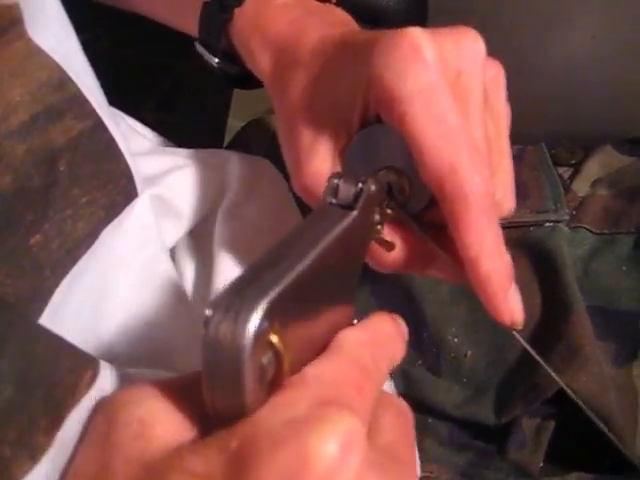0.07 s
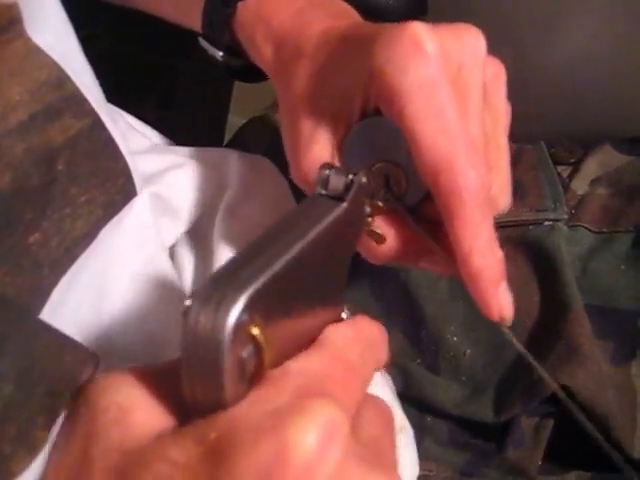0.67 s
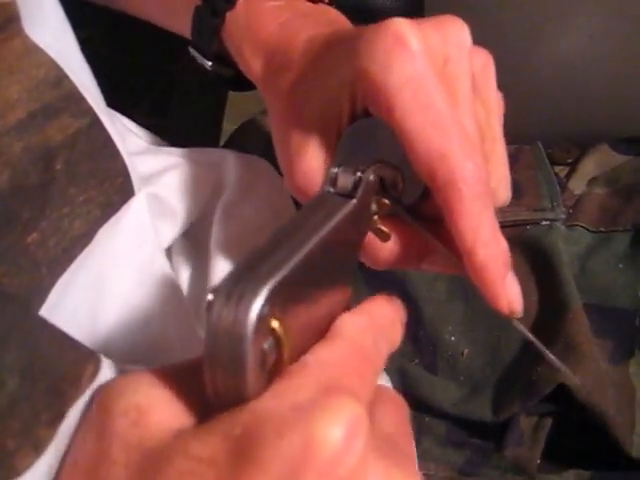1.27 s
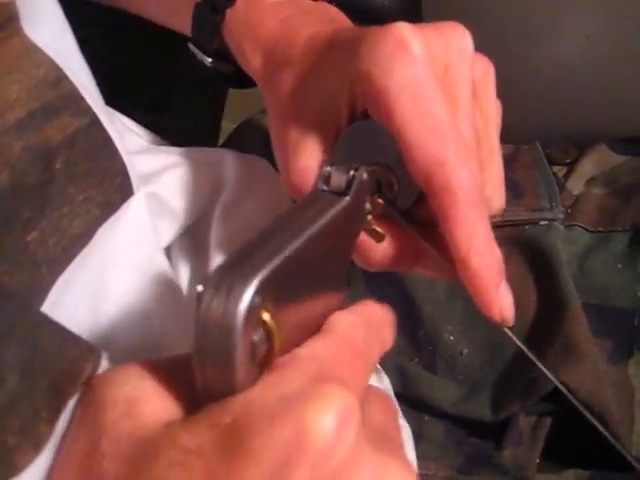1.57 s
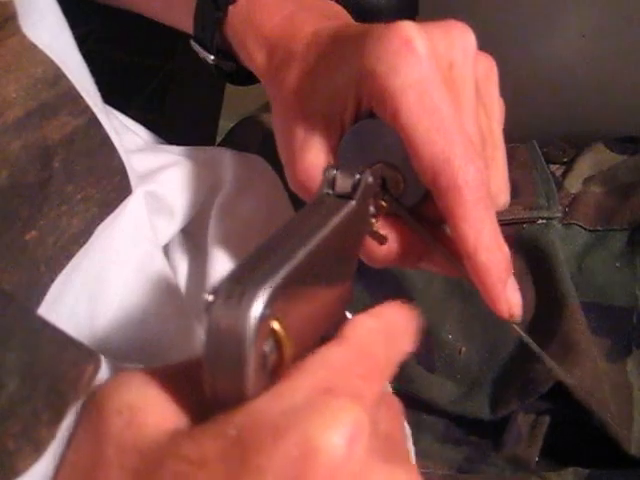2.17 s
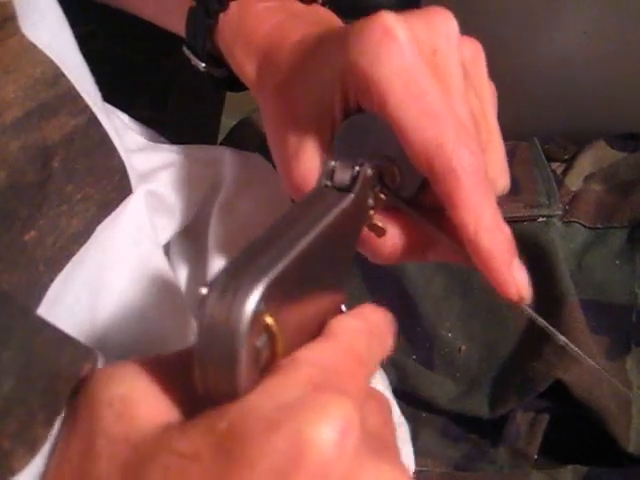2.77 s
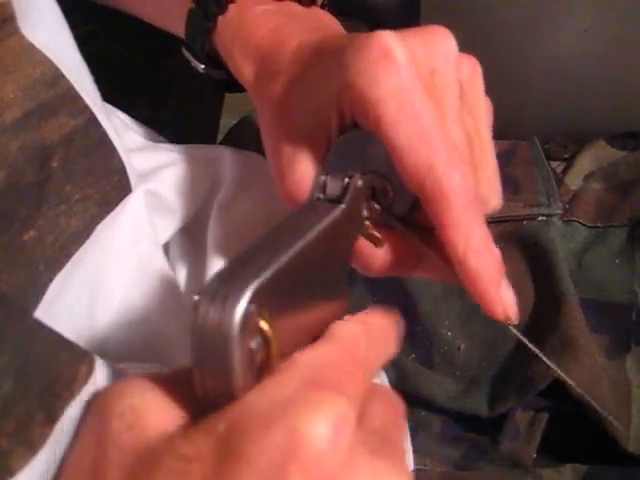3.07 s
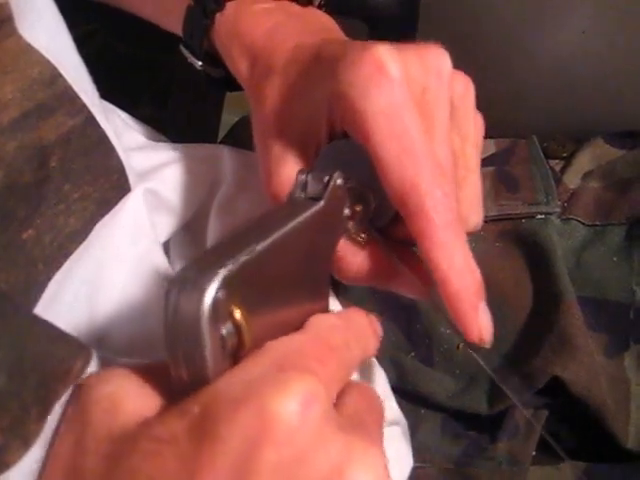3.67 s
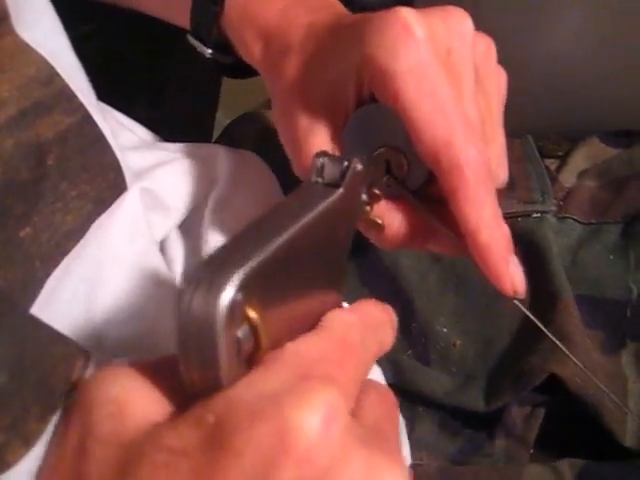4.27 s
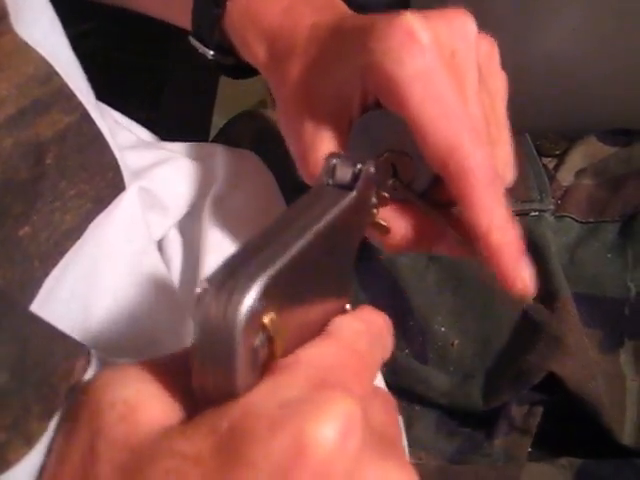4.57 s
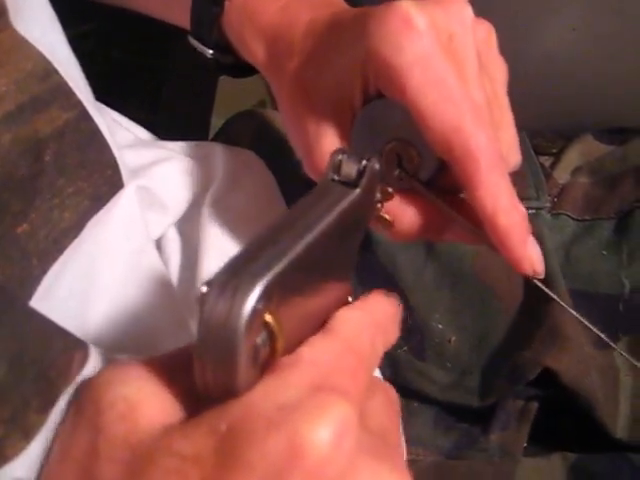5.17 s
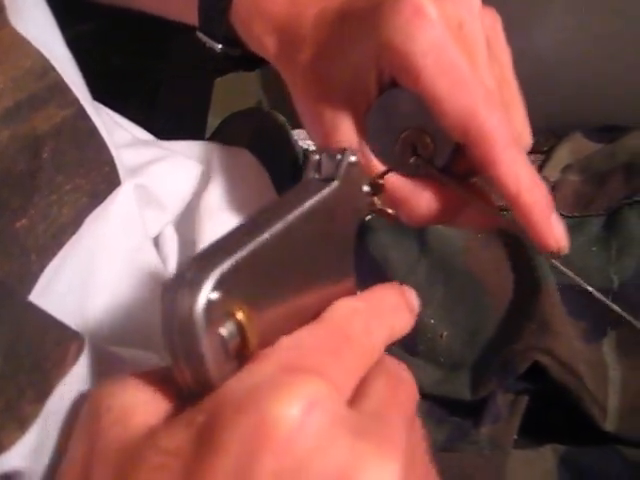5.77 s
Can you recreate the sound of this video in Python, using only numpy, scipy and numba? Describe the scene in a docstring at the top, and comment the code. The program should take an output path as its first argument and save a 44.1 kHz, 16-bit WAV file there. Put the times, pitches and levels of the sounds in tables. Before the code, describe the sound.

Sharp metallic snaps repeat throughout as a manual lock pick gun is worked against a lock, close to the microphone in a small room. Softer clicks of the trigger pulling and resetting fall between the snaps, with occasional rattles and brief scrapes from the needle. Each snap distorts slightly and makes the level dip for a moment. A short, bright echo and faint hiss and hum lie behind.

```python
"""A hand-worked lock pick gun snaps over and over in a cylinder lock, close by in a small room.
Each squeeze clacks, creeps and lets the hammer snap onto the needle; on release the trigger knocks
back, scrapes and latches. Every hit makes the steel ring, and the needle rattles and drags in the lock.
The snaps overload the microphone, whose gain control briefly turns everything down after each one,
including the room's echo, hiss and hum."""
import sys
import numpy as np
from scipy import signal
from scipy.fft import rfft, irfft
from scipy.io import wavfile
from scipy.ndimage import uniform_filter1d
from numba import njit

SR = 44100
rng = np.random.default_rng(int(sys.argv[2]) if len(sys.argv) > 2 else 0)


def put_to_file(sound):
    """Save the sound as 16-bit audio at rate SR, in the file named by the first command-line argument."""
    columns = np.atleast_2d(sound).T  # one column per channel
    safe = np.clip(columns, -1, 1)
    whole_steps = np.round(safe * 32767)
    wavfile.write(sys.argv[1], SR, whole_steps.astype(np.int16))


N = 265746

# Room air and microphone hiss: (frequency [Hz], level [dB])
AIR_SPECTRUM = [(30, 0), (100, -3), (300, -4), (500, -7.5), (1100, -5.5), (2000, -9), (5000, -11),
                (9000, -12), (11000, -8), (13000, -14.5), (15500, -13.5)]
# The room's hum and a camera's whine: (pitch [Hz], level [dB])
HUM_TONES = [(172, -61.5), (288, -62), (975, -60), (7560, -50.5)]
# The room's echo: (frequency [Hz], fade time [s], level [dB]). A fade time, or t60, is a drop of 60 dB.
ECHO_BANDS = [(150, .4, -16), (700, .4, -11), (1400, .45, -3), (2200, .52, 3), (2800, .48, -1.5),
              (4000, .48, 1), (6000, .46, 1.3), (9000, .42, 1.5), (15000, .33, 0)]
# A soft, low rush of room noise: (frequency [Hz], level [dB])
SWELL_SPECTRUM = [(60, -10), (250, -4), (500, 0), (850, -5), (1200, 1), (1700, -10), (4000, -28),
                  (15000, -45)]
# The needle drags in the keyhole: (start [s], length [s], level [dB])
NEEDLE_DRAGS = [(2.635, .115, -36.5), (4.955, .065, -35.5)]
# The hiss of the needle and the spring: (frequency [Hz], level [dB])
RASP_SPECTRUM = [(1500, -25), (3500, -9), (5000, -2), (6200, 0), (8000, -8), (15000, -22)]
# How loud the spring sizzles as the scene goes on: (time [s], level [dB])
SIZZLE_LEVELS = [(.28, -33), (1.14, -19), (1.89, -24), (2.27, -34), (5.5, -34)]
# The noisy crack of steel on steel: (frequency [Hz], level [dB])
CRACK_SPECTRUM = [(60, -15), (250, -10), (500, -14.5), (1000, -14.5), (1300, -16.5), (2100, -1), (3000, -3),
                  (5500, 0), (8000, -3), (11000, -4), (15500, -11)]
# Needle and pins rattle in the keyhole: (time [s], level [dB], pitch [Hz], brightness [dB])
PIN_RATTLES = [(.4294, -28, 2200, 0), (.5765, -23, 2790, 4.5), (2.33, -29, 2530, 2),
               (2.6352, -7.4, 2510, 1.5), (2.753, -28, 2330, 6), (2.996, -23, 2730, 1),
               (3.273, -14.6, 2260, 8.5), (3.488, -12.4, 2290, 7.5), (3.5169, -28, 2190, -9),
               (4.1109, -28, 2380, 10), (4.6039, -16.5, 2420, 3), (5.076, -25, 2440, 7),
               (5.8898, -17.7, 2800, 1), (5.8949, -22, 2210, 0), (5.9032, -18.6, 2750, 1.5),
               (5.9069, -26, 2680, -12)]
# The tones of the steel gun: (pitch [Hz], fade time [s], then a level [dB] for each spot named below)
STEEL_TONES = [(760, .007, -17.5, -12, -22, -34, -24, -17), (1680, .007, -13.5, -3, -26, -20, -21, -15),
               (2660, .011, -10.5, -4, -14, -14, -4, -9), (3300, .012, -11, -2, -5, -13, -9, -14),
               (3990, .011, -13, 1.5, -3, -13, -5, -17), (4450, .012, -13, 1, -5, -14, -5, -11),
               (5350, .012, -13, -2, -12, -14, -7, -3), (5850, .012, -14, -1, -6, -15, -5, -14),
               (6950, .012, -20, -1, -18, -22, -8, -20), (8450, .012, -23, -6, -11, -25, -10, -24)]
TRIGGER, HAMMER, RETURN_STOP, RAMP, CATCH, CATCH_EDGE = range(6)
# How each kind of hit behaves:
# (rise [s], time touching [s], main tone's fade time [s], crack [dB], first tick [dB], echo share [dB])
PULL_HIT = (.0003, .0015, .009, -11, 7, 3.5)
CREEP_HIT = (.0003, .0009, .013, -11, 0, 6)
SNAP_HIT = (.0002, .0026, .011, 2.5, 24, -5.6)
KNOCK_HIT = (.0003, .0019, .009, -11, 6, 2.5)
SCRAPE_HIT = (.0005, .0006, .013, -14, -6, 2)
LATCH_HIT = (.0002, .0012, .011, -2, 19, .8)
RATTLE_HIT = (.0002, .0010, .016, -2, 8, 4)
# Letting the trigger go; a lead is how long before the latch a sound comes:
# (latch time [s], knock lead [s], knock [dB], knock brightness [dB], scrape lead [s], scrape [dB])
TRIGGER_RELEASES = [(.0433, .045, -4, 0, .0069, -7.5), (.5244, .0381, -5, 2.5, .0086, -7.5),
                    (.9416, .0525, -5, -1, .01, -6), (1.3448, .0358, -3.5, -2.5, .0062, -15),
                    (1.7388, .0526, -2.5, -3, .0082, -9.5), (2.1043, .0355, -2.5, 0, .0086, -9.5),
                    (2.4697, .0348, -5, 3.5, .0061, -7.5), (3.0101, .0267, -2.5, 1, .0054, -9.5),
                    (3.4137, .0386, -2, -3, .0052, -8), (3.9519, .0365, -2, -2, .0051, -7),
                    (4.427, .0453, -4, 2, .0081, -7), (4.8366, .0381, -5, 1, .0062, -5.5),
                    (5.2779, .0423, -5, 4, .0065, -5.5), (5.7667, .0548, -4.5, -1, .0065, -5.5)]
# Squeezing the trigger; leads count back from the snap:
# (snap time [s], pull lead [s], pull [dB], creep lead [s], creep [dB], thud [dB])
TRIGGER_SQUEEZES = [(.2798, .1241, -9, .0548, -11.5, -35), (.7069, .0796, -6.5, .0208, -12.5, -7),
                    (1.1437, .0944, -5.5, .0324, -13.5, -13), (1.5031, .0669, -9, .0152, -13, -11),
                    (1.8881, .0654, -10.5, .0156, -12.5, -12), (2.2655, .0692, -9.5, .0188, -11, -11),
                    (2.7822, .2106, -7.5, .1567, -11, -22), (3.1883, .0601, -7, .0144, -15.5, -10),
                    (3.7326, .1791, -9.5, .0171, -14, -6), (4.1568, .1069, -9, .0543, -20.5, -35),
                    (4.6118, .0858, -7, .0283, -15.5, -10), (5.0484, .1045, -9.5, .0294, -11.5, -35),
                    (5.5058, .0971, -7, .0373, -20.5, -28)]


def gain_of(db):
    """Turns decibels into a number to multiply by."""
    return 10 ** (np.asarray(db) / 20)


def evened(x):
    """Scales a sound to an average (rms) level of 1."""
    return x / np.sqrt(np.mean(x ** 2) + 1e-20)


def evened_hit(x):
    """Scales a hit to an average (rms) level of 1 over its first 5 ms."""
    return x / np.sqrt(np.mean(x[:220] ** 2))


def look_up(points, hz):
    """Reads between a table's rows along a log-frequency axis."""
    known_hz, value = np.transpose(points)
    return np.interp(np.log(hz + 1), np.log(known_hz + 1), value)


def noise(spectrum, size):
    """Noise with the given balance of lows and highs."""
    hz = np.fft.rfftfreq(size, 1 / SR)
    return evened(irfft(rfft(rng.standard_normal(size)) * gain_of(look_up(spectrum, hz)), size))


def wobble(size, smooth_samples):
    """A smooth random wiggle."""
    return evened(uniform_filter1d(rng.standard_normal(size), size=smooth_samples))


def add(mix, start_s, sound):
    """Mixes a sound in at the given time."""
    part = mix[max(round(start_s * SR), 0):][:len(sound)]
    part += sound[:len(part)]


def background(air_db=-44.5, waver_hz=5):
    """Room air and microphone hiss, with a few gently wavering tones."""
    out = gain_of(air_db) * noise(AIR_SPECTRUM, N)
    for hz, db in HUM_TONES:
        pitch = hz + waver_hz * wobble(N, 800)
        out += gain_of(db) * np.sqrt(2) * np.sin(2 * np.pi * np.cumsum(pitch) / SR)
    return out


def room_echo(x, first_s=.0095, early_t60=.085, build_s=.006, early_db=-27.5, tail_db=-30.5):
    """Nearby surfaces bounce the sound back first; then a blurred tail fades, band by band."""
    t = np.arange(SR) / SR
    since = np.maximum(t - first_s, 0)
    table = np.array(ECHO_BANDS)
    hz, age, bands = signal.stft(rng.standard_normal(SR), SR, nperseg=256)
    band_db = look_up(table[:, [0, 2]], hz)[:, None]
    band_t60 = look_up(table[:, :2], hz)[:, None]
    bands *= gain_of(band_db - 60 * age / band_t60)
    tail = signal.istft(bands, SR, nperseg=256)[1][:SR] * (1 - np.exp(-since / build_s))
    bounces = rng.choice([-1., 1.], SR) * (rng.random(SR) < 2000 / SR)
    early = bounces * (since > 0) * gain_of(-60 * since / early_t60)
    echo = gain_of(tail_db) * evened(tail) + gain_of(early_db) * evened(early)
    return signal.fftconvolve(x, echo / np.sqrt(SR))[:N]


def closing_swell(start_s=5.85, length_s=.2, db=-52.5):
    """A soft, low rush of room noise swells up at the end."""
    out, size = np.zeros(N), round(length_s * SR)
    add(out, start_s, gain_of(db) * noise(SWELL_SPECTRUM, size) * signal.windows.tukey(size, .5))
    return out


def hand_bump(start_s=2.047, db=-33, hz=210, t60=.04):
    """The hand knocks against the grip, soft and low."""
    age = np.maximum(np.arange(N) / SR - start_s, 0)
    return gain_of(db - 60 * age / t60) * np.sin(2 * np.pi * hz * age)


def needle_drags(grain_db=3):
    """The thin needle rasps along the brass with a short, grainy hiss."""
    out = np.zeros(N)
    for start_s, length_s, db in NEEDLE_DRAGS:
        size = round(length_s * SR)
        grain = gain_of(grain_db * wobble(size, 150))
        rasp = evened(noise(RASP_SPECTRUM, size) * grain)
        add(out, start_s, gain_of(db) * rasp * signal.windows.tukey(size, .7))
    return out


def sliding(starts, ends, ring_hz, level_db, swell_db, swell_s,
            slips_per_s=2200, t60=.007, grit_db=-8, brisk_s=.115):
    """Between hits, tiny slips of steel on steel ring the lever and swell toward the next hit."""
    t, force = np.arange(N) / SR, np.zeros(N)
    for end, *_ in ends:
        recent = [start for start, *_ in starts if 0 < end - start < .2]
        begin = recent[-1] if recent else end - .04
        moving = (t > begin) & (t < end)
        pace = min(brisk_s * SR / moving.sum(), 1)  # a slow stroke rubs more softly
        swell = gain_of(swell_db) * np.exp((t[moving] - end) / swell_s)
        force[moving] = pace ** 2 * gain_of(level_db) + swell
    slips = rng.standard_normal(N) * rng.exponential(1, N) * (rng.random(N) < slips_per_s / SR)
    age = t[:1024]
    fade = gain_of(-60 * age / t60)
    ring = evened(np.sin(2 * np.pi * ring_hz * age) * fade)
    grit = evened(noise(CRACK_SPECTRUM, len(age)) * fade)
    return force * evened(signal.oaconvolve(slips, ring + gain_of(grit_db) * grit)[:N])


def thud_and_sizzle(thud_s=.0011, sizzle_t60=.3, grain_db=4):
    """A dull, low thud of microphone overload comes with each snap, and the spring sizzles."""
    out, t = np.zeros(N), np.arange(SR // 2) / SR
    thud = t / thud_s * np.exp(1 - t / thud_s)
    for snap_s, *_, thud_db in TRIGGER_SQUEEZES:
        start_db = np.interp(snap_s, *np.transpose(SIZZLE_LEVELS))
        sizzle_db = start_db + grain_db * wobble(len(t), 100) - 60 * t / sizzle_t60
        add(out, snap_s, gain_of(thud_db) * thud + gain_of(sizzle_db) * noise(RASP_SPECTRUM, len(t)))
    return out


def steel_hit(ring_hz, bright_db, kind, tones,
              crack_t60=.016, scatter_db=1.7, detune=.022, tick_hz=(2600, 8000)):
    """A tick, a crack and a ring that holds while the parts touch, then dies in the gripping hand."""
    rise_s, touch_s, ring_t60, crack_db, tick_db, _ = kind
    t = np.arange(2048) / SR
    since_parting = np.maximum(t - touch_s, 0)
    hz, t60, db = np.vstack([(ring_hz, ring_t60, 0), tones]).T[:, :, None]
    level_shift, pitch_shift = rng.standard_normal((2, len(hz), 1))
    side_tone = hz != ring_hz  # all but the main tone get a random nudge
    db = db + side_tone * scatter_db * level_shift + bright_db * (hz > 3000)
    cycles = hz * (1 + side_tone * detune * pitch_shift) * t + rng.random((len(hz), 1))
    waves = gain_of(db - 60 * since_parting / t60) * np.sin(2 * np.pi * cycles)
    ring = evened_hit(waves.sum(0) * (1 - np.exp(-t / rise_s)))
    crack = evened_hit(noise(CRACK_SPECTRUM, len(t)) * gain_of(-60 * t / crack_t60))
    tick = signal.lfilter(*signal.butter(1, tick_hz, "bandpass", fs=SR), 1. * (t == 0))
    body = evened_hit(ring + gain_of(crack_db + bright_db / 2) * crack)
    return evened_hit(body + gain_of(tick_db) * tick / abs(tick).max())


def hits(rows, kind, spot):
    """All hits of one kind on one spot of the gun: the direct sound and the share sent to the room."""
    tones = np.array(STEEL_TONES)[:, [0, 1, 2 + spot]]
    out = np.zeros(N)
    for time_s, db, ring_hz, bright_db in rows:
        if time_s > 0:
            add(out, time_s, gain_of(db) * steel_hit(ring_hz, bright_db, kind, tones))
    return np.array([out, gain_of(kind[-1]) * out])


def hit_rows(times, db, ring_hz, bright_db=0, spread=.02):
    """Lists hits as (time [s], level [dB], pitch [Hz], brightness [dB]); no two ring quite alike."""
    pitch = ring_hz * (1 + spread * rng.standard_normal(len(times)))
    return np.column_stack(np.broadcast_arrays(times, db, pitch, bright_db))


def releases(latch_db=4.5):
    """The trigger knocks back; the catch scrapes over the hammer and springs into its latch."""
    latch_s, knock_lead, knock_db, bright_db, scrape_lead, scrape_db = np.transpose(TRIGGER_RELEASES)
    return (hit_rows(latch_s - knock_lead, knock_db, ring_hz=2440, bright_db=bright_db),
            hit_rows(latch_s - scrape_lead, scrape_db, ring_hz=2350),
            hit_rows(latch_s, latch_db, ring_hz=2200))


def squeezes(snap_db=19.5):
    """The trigger pulls the hammer, the catch creeps, and the spring snaps equally hard every time."""
    snap_s, pull_lead, pull_db, creep_lead, creep_db, _ = np.transpose(TRIGGER_SQUEEZES)
    return (hit_rows(snap_s - pull_lead, pull_db, ring_hz=2130),
            hit_rows(snap_s - creep_lead, creep_db, ring_hz=2230),
            hit_rows(snap_s, snap_db, ring_hz=2450))


def scene():
    """Mixes the gun's hits, the sliding between them, a hand bump and the room."""
    pulls, creeps, snaps = squeezes()
    knocks, scrapes, latches = releases()
    direct, to_room = (hits(pulls, PULL_HIT, TRIGGER) + hits(creeps, CREEP_HIT, CATCH_EDGE)
                       + hits(snaps, SNAP_HIT, HAMMER) + hits(knocks, KNOCK_HIT, RETURN_STOP)
                       + hits(scrapes, SCRAPE_HIT, RAMP) + hits(latches, LATCH_HIT, CATCH)
                       + hits(PIN_RATTLES, RATTLE_HIT, CATCH))
    slack_rub = sliding(latches, pulls, ring_hz=2050, level_db=-50, swell_db=-34, swell_s=.005)
    squeeze_rub = sliding(pulls, snaps, ring_hz=2050, level_db=-44, swell_db=-43, swell_s=.03)
    release_rub = sliding(knocks, scrapes, ring_hz=2330, level_db=-41, swell_db=-17, swell_s=.003)
    gun = direct + slack_rub + squeeze_rub + release_rub + thud_and_sizzle() + needle_drags()
    return (gun + hand_bump() + closing_swell() + room_echo(to_room) + background())[None]


@njit
def gain_control(over_db, attack_s=.0019, hold_s=.06, recovery_db_per_s=110):
    """How many dB to turn down: the cut grows fast when the sound is too loud, waits, then lets go."""
    cut_db, now, wait = np.zeros(len(over_db)), 0., 0.
    for i in range(len(over_db)):
        if over_db[i] > now:
            now += (over_db[i] - now) / (attack_s * SR)
            wait = hold_s * SR
        elif wait > 0:
            wait -= 1
        else:
            now = max(now - recovery_db_per_s / SR, 0.)
        cut_db[i] = now
    return cut_db


def record(dry, limit_db=-5.5, max_cut_db=17, lopsided=.03, dull_hz=13000, top_hz=15950):
    """The microphone turns loud moments down, flattens the peaks that overload it and trims the highs."""
    over_db = np.clip(20 * np.log10(abs(dry[0]) + 1e-9) - limit_db, 0, max_cut_db)
    turned_down = dry[0] / gain_of(gain_control(over_db))
    fine = signal.resample_poly(turned_down, 4, 1)  # finer steps keep false tones out of the overload
    ceiling = .89 + lopsided * np.sign(fine)  # one side of the wave flattens a little sooner
    flattened = fine / (1 + (fine / ceiling) ** 6) ** (1 / 6)
    clipped = signal.resample_poly(flattened, 1, 4)
    centred = signal.lfilter(*signal.butter(1, 20, "highpass", fs=SR), clipped)
    dulled = signal.lfilter(*signal.butter(1, dull_hz, fs=SR), centred)
    top_cut = signal.firwin(255, top_hz, window=("kaiser", 8), fs=SR)
    return signal.oaconvolve(dulled, top_cut, "same")[None]


dry = scene()
out = record(dry)
put_to_file(out)
```